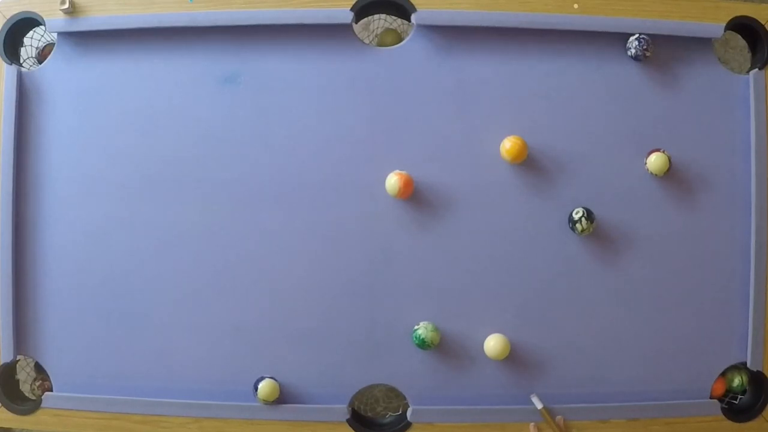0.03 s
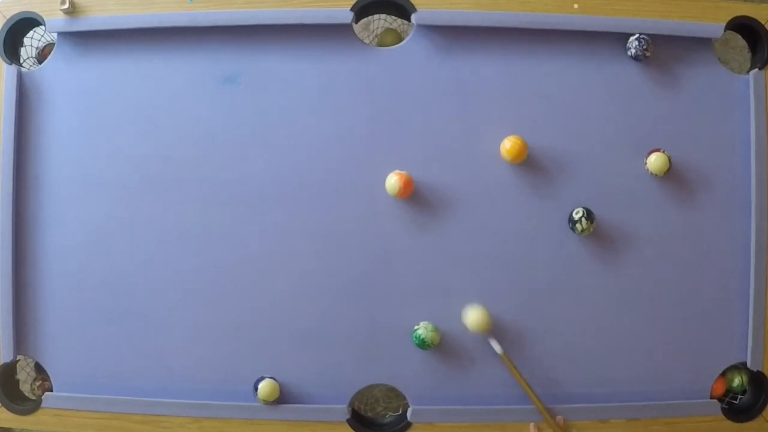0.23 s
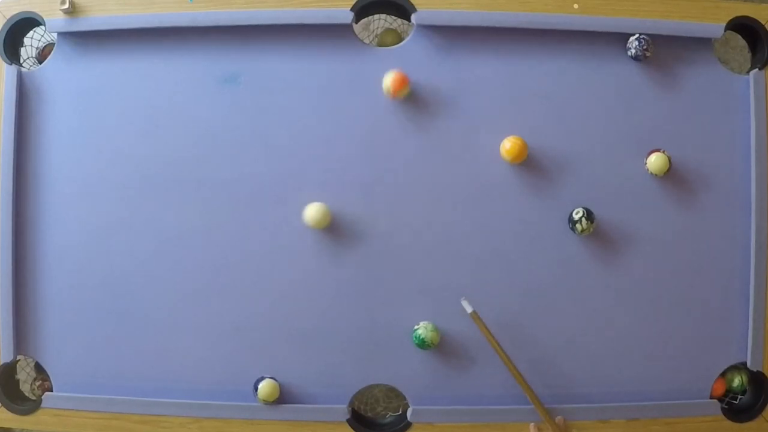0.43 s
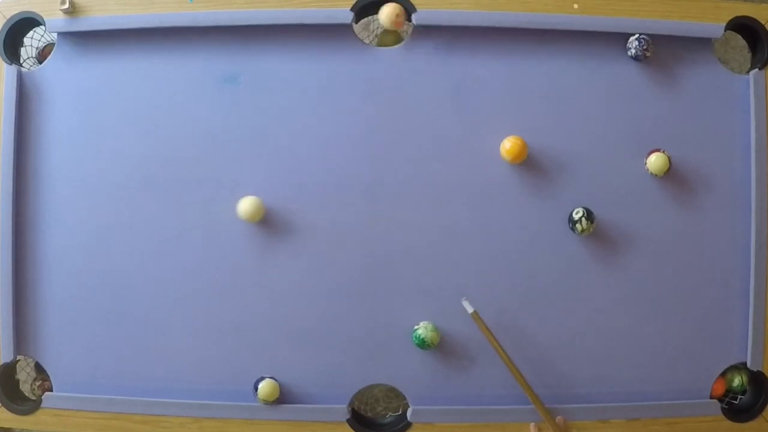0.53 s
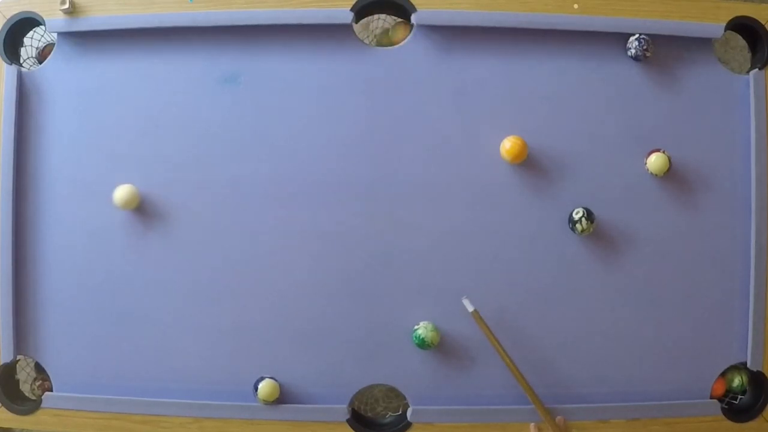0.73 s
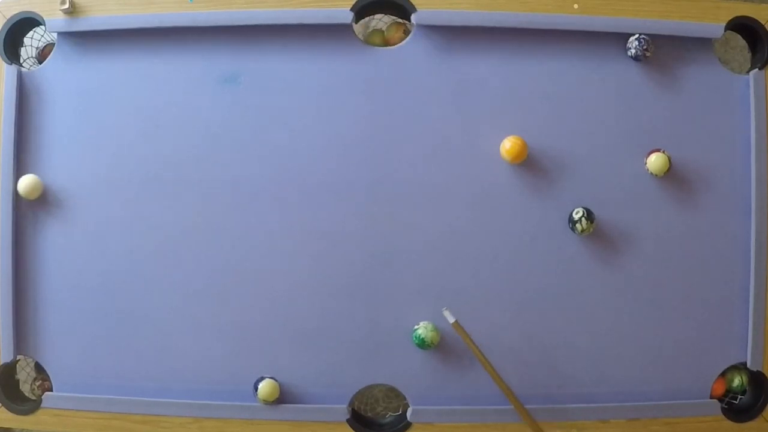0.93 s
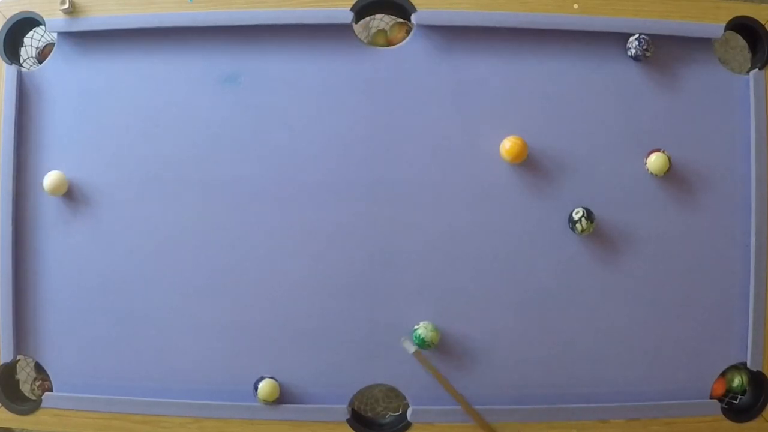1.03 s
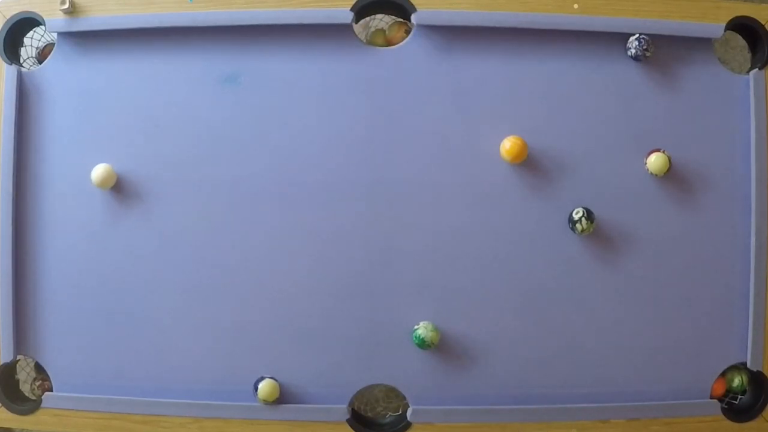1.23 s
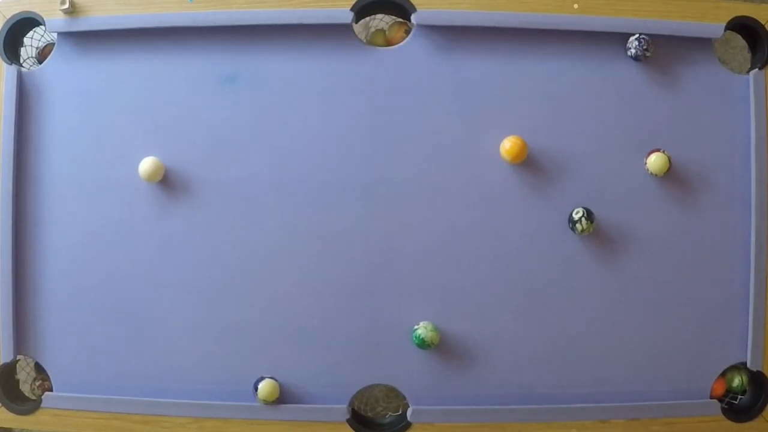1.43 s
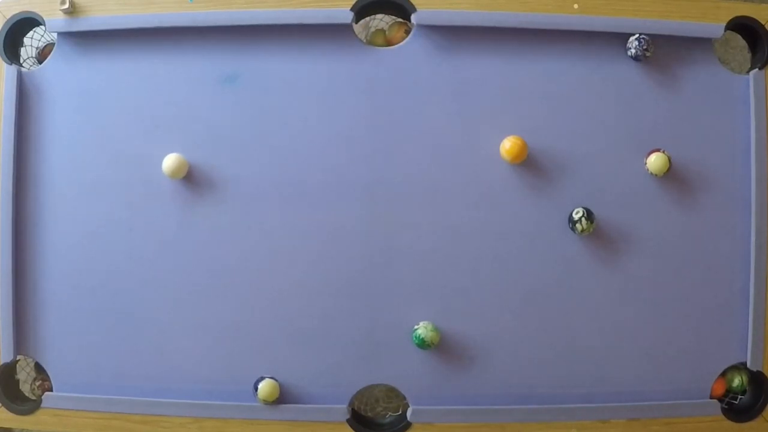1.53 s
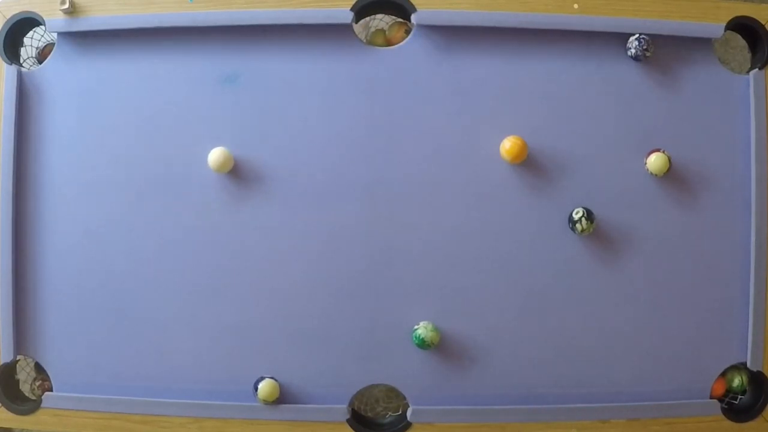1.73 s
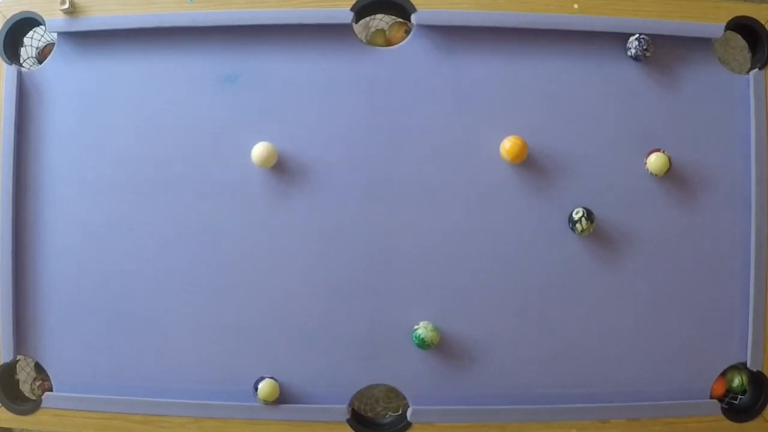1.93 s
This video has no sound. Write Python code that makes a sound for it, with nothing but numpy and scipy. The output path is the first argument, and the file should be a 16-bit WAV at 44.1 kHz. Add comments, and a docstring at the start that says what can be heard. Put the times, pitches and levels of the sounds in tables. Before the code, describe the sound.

A pool shot in a hard-walled room: the cue knocks the white ball, which clicks another. That ball slams into a pocket, rattles and lands on a ball, then the white thumps the cushion. The microphone is above the table.

```python
"""A cue knocks the white ball in a hard-walled room. The white clicks an object ball, which slams into a
pocket, rattles and lands on another ball; the white rolls on and thumps the cushion. Each impact is an
impulse shaped by the contact; cue, table bed, pocket and rail ring on in damped modes, and the room
reverberates. Beneath lie the rumble of rolling and a faint room tone, which the gain control of the
microphone above the table ducks at loud hits and lets creep back."""
import sys
import numpy as np
from scipy import signal
from scipy.fft import rfft, irfft
from scipy.io import wavfile
from scipy.ndimage import uniform_filter1d, minimum_filter1d

SR = 44100
rng = np.random.default_rng(int(sys.argv[2]) if len(sys.argv) > 2 else 0)


def to_wav(s):
    """Save 16-bit WAV."""
    ch = np.atleast_2d(s).T  # columns
    pcm = np.round(np.clip(ch, -1, 1) * 32767)  # PCM
    wavfile.write(sys.argv[1], SR, pcm.astype(np.int16))


N = 88200
TIME, FREQ = np.arange(N) / SR, np.fft.rfftfreq(N, 1 / SR)
TABLE_LEFT_DB, RIGHT_LAG_S = 2, .00009  # stereo position of the table's boom

# cue strokes (t/s, level/dB)
STROKES = [(0.2364, 6.5)]
# spectrum of the tip's contact (f/Hz, level/dB)
STROKE_SPECTRUM = [(50, 0), (90, 18), (150, 33), (300, 35), (900, 27), (1400, 13.5), (2000, 12.5),
                   (2450, 0.5), (3500, 5.5), (6400, -1.5), (9000, -22), (15000, -34.5)]
# modes of the shaft and of the table bed (f/Hz, level/dB, T60/s)
SHAFT_MODES = [(1530, -38, 0.57), (1860, -49, .3), (2060, -36.5, 0.63), (2950, -40, 0.068),
               (3140, -41, .25), (3580, -32, .22), (4020, -49, .25), (6050, -36.5, 0.05)]
BED_MODES = [(155, -11, 0.26), (172.4, -15, 0.32), (244.1, -14, 0.18), (277, -12, 0.15), (567.4, -26, 0.13),
             (780, -34.5, 0.11)]
def cue():
    """Impulse excitation: the tip knocks the white, the shaft rings and the table bed booms."""
    modes = ring(SHAFT_MODES) + ring(BED_MODES, hold_s=0.046)
    direct = 0
    for stroke in STROKES:
        knock = contact(STROKE_SPECTRUM, ring_db=2.6, t60=0.22, hold_s=0.057)
        direct += blow(knock + modes, *stroke)
    in_room = reverberate(direct, wet_db=0, left_db=TABLE_LEFT_DB, lag_s=RIGHT_LAG_S)
    return in_room + undb(-4.5) * early_echoes(direct)


# ball on ball (t/s, level/dB, treble tilt/dB per octave)
CLICKS = [(0.3461, -0.5, 1.5), (0.7326, -4, -2)]
# spectrum of a click (f/Hz, level/dB)
CLICK_SPECTRUM = [(100, 11.5), (600, -9), (1300, 15.5), (2200, 21), (3400, 20), (4500, 12.5), (5700, 4),
                  (7000, -24.5), (10000, -43), (15000, -38)]
def ball_clicks():
    """Elastic collision: hard balls meet for a fraction of a millisecond; the room supplies the ring."""
    click = colour(signal.unit_impulse(N), CLICK_SPECTRUM)
    direct = sum(blow(click, *hit) for hit in CLICKS)
    return reverberate(direct, wet_db=9) + undb(0.5) * early_echoes(direct)


# ball against the pocket (t/s, level/dB, treble tilt/dB per octave, bass shelf/dB)
POCKET_HITS = [(0.5502, 3.5, -1, -0.5), (.638, 1, -5.5, -9.5), (.660, -8, -6, -1)]
# spectrum of that contact (f/Hz, level/dB)
POCKET_SPECTRUM = [(50, -14), (100, 24.5), (160, 37.5), (280, 35), (430, 26), (850, 30), (1400, 15),
                   (2300, 6.5), (4500, -4), (6500, -3), (9500, -23.5), (15000, -53)]
# modes of the pocket (f/Hz, level/dB, T60/s)
POCKET_MODES = [(162, -41, 0.6), (190, -43, 0.067), (239, -22.5, 0.067), (285, -11, 0.15),
                (513, -29.5, 0.24), (690, -42, .12), (770, -11, 0.047), (858, -18.5, 0.084),
                (1000, -37.5, .14), (1430, -19.5, 0.05)]
def pocket():
    """Repeated impact: the ball excites the pocket's modes as it hits the back and rattles down."""
    direct = 0
    for hit in POCKET_HITS:
        knock = contact(POCKET_SPECTRUM, ring_db=3.6, t60=0.15, hold_s=.01)
        direct += blow(knock + ring(POCKET_MODES), *hit)
    in_room = reverberate(direct, wet_db=4.5, left_db=1, lag_s=RIGHT_LAG_S)
    return in_room + undb(-1) * early_echoes(direct)


# ball against the cushion, then settling from a small hop (t/s, level/dB, treble tilt/dB per octave)
CUSHION_HITS = [(.941, -3.5, -4.5), (.961, 1.5, -0.5), (1.016, -8, -10)]
# spectrum of that contact (f/Hz, level/dB)
CUSHION_SPECTRUM = [(50, 11), (110, 4.5), (180, 33.5), (310, 25), (450, 13.5), (680, 4.5), (1000, 6),
                    (2000, -15), (6000, -48), (12000, -58)]
# modes of the rail (f/Hz, level/dB, T60/s)
RAIL_MODES = [(110, -39, .15), (163, -23, .13), (197, -20, .13), (289, -20, .13), (382, -30, .13),
              (484, -33, .15), (587, -37, .12)]
def cushion():
    """Compliant contact: rubber softens the blow, so only the low modes of the rail answer."""
    direct = 0
    for hit in CUSHION_HITS:
        thump = contact(CUSHION_SPECTRUM, ring_db=8, t60=0.18, hold_s=0.022)
        direct += blow(thump + ring(RAIL_MODES, hold_s=0.054), *hit)
    return reverberate(direct, wet_db=-6, left_db=TABLE_LEFT_DB, lag_s=RIGHT_LAG_S)


# spectrum of the sharp onset of a hard contact (f/Hz, level/dB)
SNAP_SPECTRUM = [(1500, -26), (4000, 4), (5600, 9), (7500, -7), (10000, -20), (13000, -22), (15000, -22)]
def snaps():
    """Directivity: the treble of each hard contact beams straight up at the microphone."""
    tick = colour(signal.unit_impulse(N), SNAP_SPECTRUM)
    groups = [(STROKES, -3), (CLICKS, -2.5), (POCKET_HITS, 2)]
    return sum(undb(db) * blow(tick, *hit) for hits, db in groups for hit in hits)


# spectral densities of the rumble and of the cloth's hiss (f/Hz, relative level/dB)
RUMBLE_SPECTRUM = [(20, 13.5), (45, 14.5), (90, 10), (130, -2.5), (170, -0.5), (280, -10.5), (500, -18.5),
                   (1500, -37), (6000, -50.5)]
CLOTH_SPECTRUM = [(1000, -10.5), (3500, -3.5), (5800, 1.5), (8000, -8), (14000, -24)]
# their envelopes (t/s, level/dB)
RUMBLE_ENVELOPE = [(.22, -66), (.3, -54), (.55, -24.5), (.8, -27.5), (1.25, -38.5), (1.6, -40), (2, -44.5)]
CLOTH_ENVELOPE = [(.2, -84), (.5, -51.5), (1.2, -59), (1.39, -55.5), (1.52, -62.5), (1.68, -57.5),
                  (1.8, -54), (2, -59.5)]
def rolling():
    """Rolling noise: an uneven rumble that dies away as the balls slow, and a thin hiss from the cloth."""
    bumps_db = 3 * drift(steps_per_s=18)
    rumble_db = np.interp(TIME, *np.array(RUMBLE_ENVELOPE).T) + bumps_db
    hiss_db = np.interp(TIME, *np.array(CLOTH_ENVELOPE).T)
    hiss = undb(hiss_db) * shaped_noise(CLOTH_SPECTRUM)
    return undb(rumble_db) * shaped_noise(RUMBLE_SPECTRUM) + hiss


# early reflections (delay/s, level/dB, left minus right/dB)
ECHOES = [(.0026, 1.5, 3.5), (.0062, 0.5, -5.5), (.0089, 2.5, -5.5), (0.0104, -7, -2), (0.013, -8, -17)]
def early_echoes(x):
    """Specular reflection: the ceiling and nearest walls return the treble as sharp echoes."""
    treble = signal.sosfilt(signal.butter(2, 1200, "high", fs=SR, output="sos"), x)
    return sum(undb(db) * pan(left_db) * delay(treble, s) for s, db, left_db in ECHOES)


# response of the room (f/Hz, relative level/dB)
ROOM_SPECTRUM = [(120, -6.5), (300, -4.5), (700, -3), (1500, -0.5)]
# reverberation time by band (f/Hz, T60/s)
ROOM_T60 = [(120, 0.39), (300, 0.38), (700, 0.46), (1500, 0.71), (3000, 0.67), (5500, 0.51), (9000, 0.61),
            (14000, 0.24)]
def reverberate(x, wet_db, left_db=0, lag_s=0):
    """Reverberation: the direct sound is followed by a diffuse tail with its own decay in each band."""
    onset_s, build_s = 0.003, 0.0097
    noise = rfft(diffuse_noise()) * undb(curve(ROOM_SPECTRUM, FREQ))
    tail = 0
    for centre, t60 in ROOM_T60:
        band = curve([(f, f == centre) for f, _ in ROOM_T60], FREQ)  # 1 here, 0 at the other centres
        tail += irfft(noise * band, N) * decay(t60)
    tail *= 1 - np.exp(-np.maximum(TIME - onset_s, 0) / build_s)
    tail *= undb(wet_db) / np.sqrt(np.sum(tail ** 2) / 2)
    direct = np.array([x, delay(x, lag_s)])
    return pan(left_db) * (direct + signal.fftconvolve(x[None], tail, axes=1)[:, :N])


# spectral density of the room tone (f/Hz, relative level/dB)
TONE_SPECTRUM = [(25, -25), (90, -23), (160, 4), (230, -4), (400, -10), (1000, -12.5), (2500, -20.5),
                 (4200, -25), (5800, -24.5), (9000, -24), (13000, -33), (15500, -47)]
def room_tone():
    """Stationary noise: a faint low murmur of the room with a thin hiss."""
    return undb(-51.5) * shaped_noise(TONE_SPECTRUM)


# width of the diffuse field (f/Hz, side relative to mid/dB)
DIFFUSE_WIDTH = [(100, -14), (300, -12), (560, -4), (1000, -.5), (2000, -3), (4000, -4), (8000, -1)]
def diffuse_noise():
    """Diffuse-field coherence: left and right are alike in the bass and differ higher up."""
    mid, side = rfft(rng.standard_normal((2, N)))
    width = undb(curve(DIFFUSE_WIDTH, FREQ))
    return irfft(np.array([mid + width * side, mid - width * side]) / np.sqrt(1 + width ** 2), N)


def shaped_noise(spectrum):
    """Spectral shaping: filtered diffuse noise at rms 1."""
    noise = colour(diffuse_noise(), spectrum)
    return noise / np.sqrt(np.mean(noise ** 2))


def contact(spectrum, ring_db, t60, hold_s):
    """Impulse response: one sharp push, then dense ringing with ring_db more energy than the push."""
    burst = rng.standard_normal(N) * decay(t60, hold_s)
    burst *= undb(ring_db) / np.linalg.norm(burst)
    burst[0] += 1  # the push
    return colour(burst, spectrum)


def ring(modes, hold_s=0):
    """Modal superposition: a struck object sounds as a sum of damped sinusoids."""
    return sum(undb(db) * decay(t60, hold_s) * np.sin(2 * np.pi * hz * TIME) for hz, db, t60 in modes)


def blow(sound, start_s, db, tilt_db=0, bass_db=0):
    """Spectral tilt and shelf for one hit: a softer blow is duller, a glancing one has less bass."""
    shelf = [(350, bass_db), (650, 0)]
    return undb(db) * delay(colour(sound, shelf, tilt_db), start_s)


def colour(x, spectrum, tilt_db=0):
    """Minimum-phase filter: the given spectrum, tilted by tilt_db per octave above 700 Hz."""
    hz = np.maximum(np.fft.rfftfreq(2 * N, 1 / SR), 1)
    gain_db = curve(spectrum, hz) + tilt_db * np.maximum(np.log2(hz / 700), 0)
    cepstrum = irfft(np.log(undb(gain_db)))
    cepstrum[1:N] *= 2  # folding onto positive time makes the filter causal
    cepstrum[N + 1:] = 0
    return irfft(rfft(x, 2 * N) * np.exp(rfft(cepstrum)))[..., :N]


def decay(t60, hold_s=0):
    """Exponential damping: holds, then loses 60 dB in t60 seconds."""
    return np.exp(-np.log(1000) * np.maximum(TIME - hold_s, 0) / t60)


def drift(steps_per_s):
    """Smoothed random steps with a spread near 1."""
    size = int(SR / steps_per_s)
    steps = rng.standard_normal(200)
    return uniform_filter1d(steps[np.arange(N) // size % len(steps)], size)


def delay(x, s):
    """Pure delay of s seconds."""
    shift = round(s * SR)
    return np.concatenate([np.zeros(x.shape[:-1] + (shift,)), x[..., :N - shift]], axis=-1)


def pan(left_db):
    """Left and right gains for a level difference."""
    return undb(np.array([[left_db], [-left_db]]) / 2)


def curve(points, hz):
    """Interpolation of (f/Hz, value) points on a log-frequency axis."""
    f, values = np.array(points, float).T
    return np.interp(np.log(np.maximum(hz, 1)), np.log(f), values)


def undb(db):
    """Decibels to amplitude ratio."""
    return 10 ** (np.asarray(db) / 20)


def scene():
    """Superposition: the impacts add to the rolling and the room tone."""
    impacts = cue() + ball_clicks() + pocket() + cushion() + snaps()
    return undb(-0.5) * impacts + rolling() + room_tone()


# low-frequency response of the microphone (f/Hz, gain/dB)
MIC_BASS_CUT = [(90, -13.5), (130, -0.5)]
def record(dry):
    """Automatic gain control, fast to duck and slow to recover; then bass cut, limiter and top cut."""
    threshold_db, slope, release_s, lag_s = -18.5, 0.42, 0.25, 0.006
    ceiling, top_hz = .92, 15300
    window = int(.005 * SR)
    power = uniform_filter1d((dry ** 2).mean(axis=0), window)
    rms = np.sqrt(np.maximum(power, 1e-12))
    release = TIME / release_s
    held = np.exp(np.maximum.accumulate(np.log(rms) + release) - release)  # peaks fall exponentially
    gain = np.maximum(held / undb(threshold_db), 1) ** -slope
    ducked = dry * (1 + delay(uniform_filter1d(gain, window) - 1, lag_s))
    bass_gain = undb(curve(MIC_BASS_CUT, np.fft.rfftfreq(2 * N, 1 / SR)))
    thinned = irfft(rfft(ducked, 2 * N) * bass_gain)[:, :N]
    limiter_gain = ceiling / np.maximum(np.abs(thinned).max(axis=0), ceiling)
    limited = thinned * uniform_filter1d(minimum_filter1d(limiter_gain, window), window)
    return signal.sosfilt(signal.ellip(8, .2, 70, top_hz, fs=SR, output="sos"), limited)


dry = scene()
out = record(dry)
to_wav(out)
```